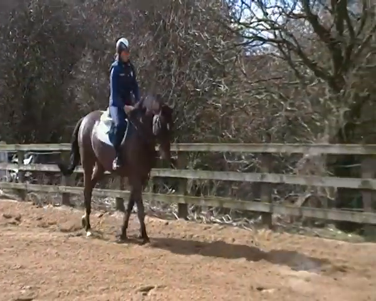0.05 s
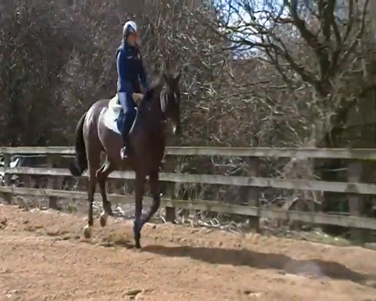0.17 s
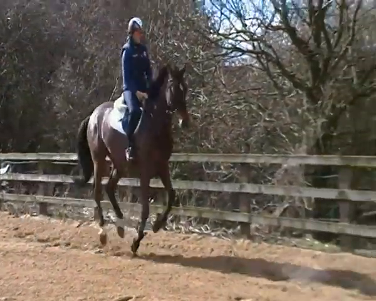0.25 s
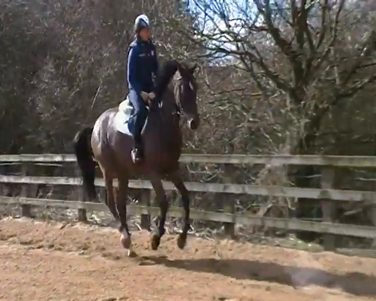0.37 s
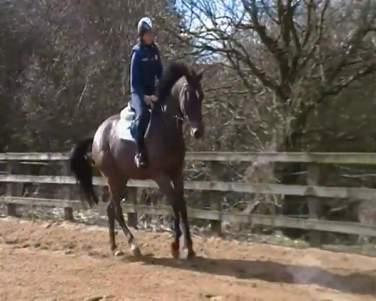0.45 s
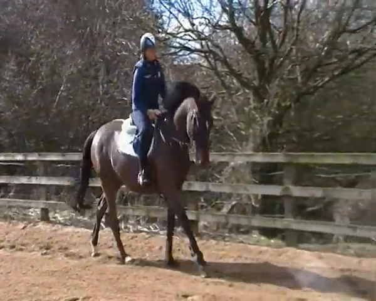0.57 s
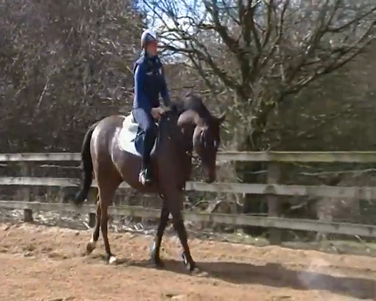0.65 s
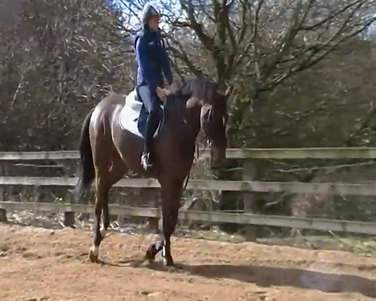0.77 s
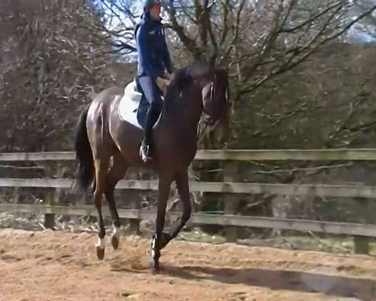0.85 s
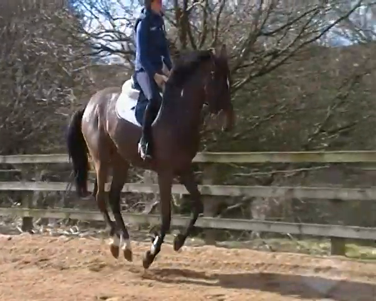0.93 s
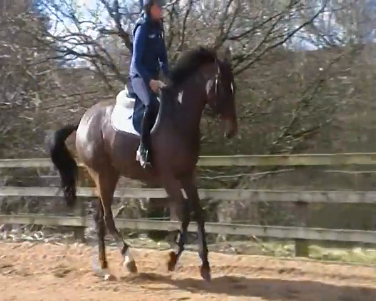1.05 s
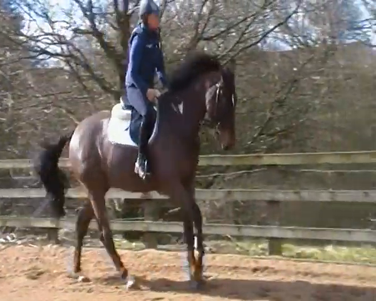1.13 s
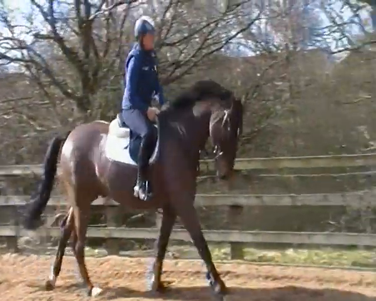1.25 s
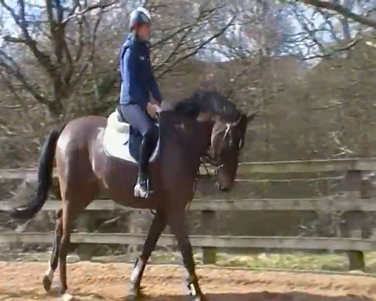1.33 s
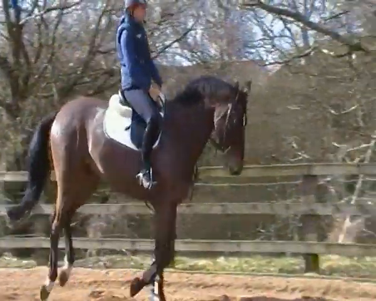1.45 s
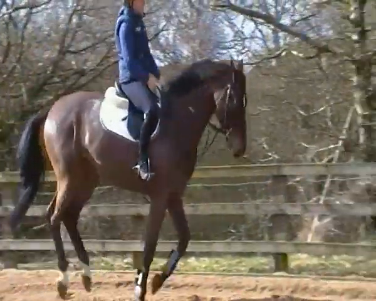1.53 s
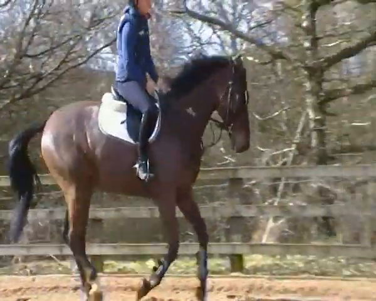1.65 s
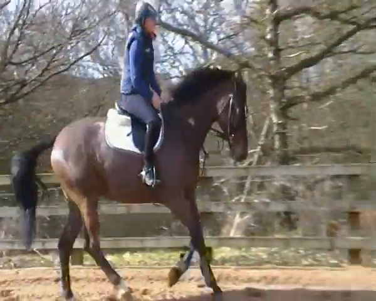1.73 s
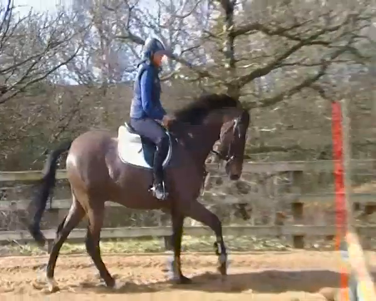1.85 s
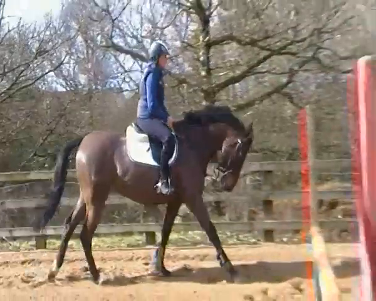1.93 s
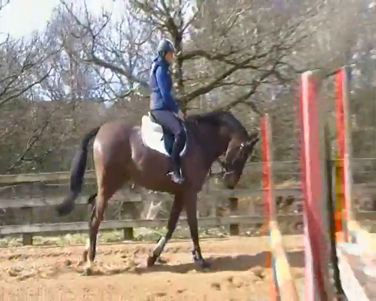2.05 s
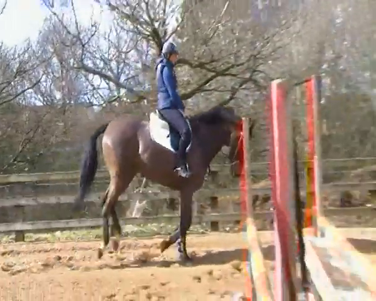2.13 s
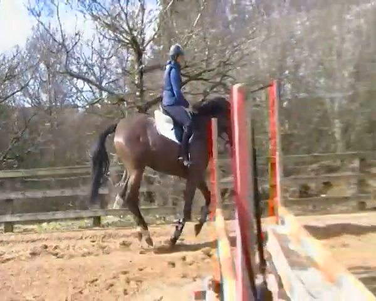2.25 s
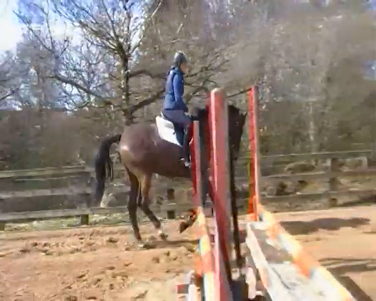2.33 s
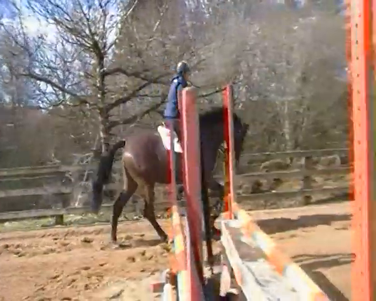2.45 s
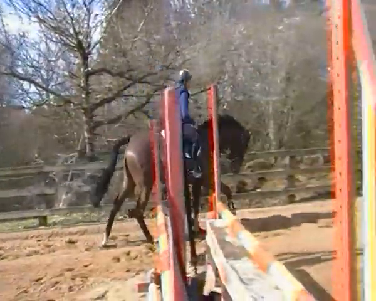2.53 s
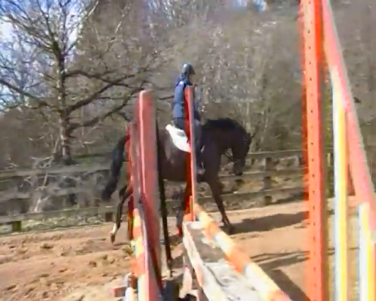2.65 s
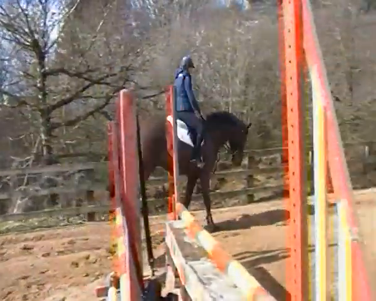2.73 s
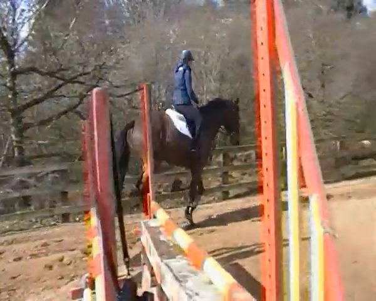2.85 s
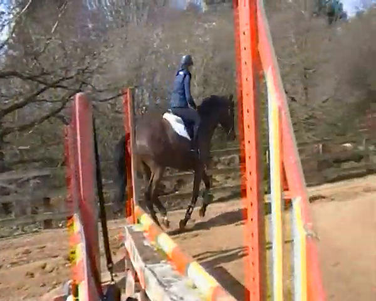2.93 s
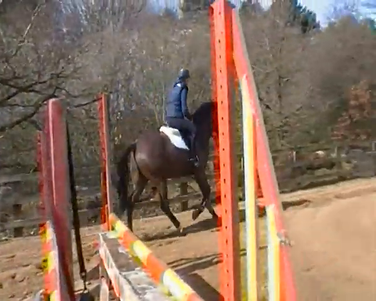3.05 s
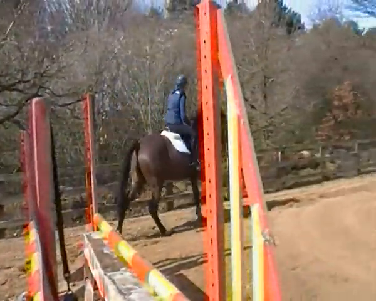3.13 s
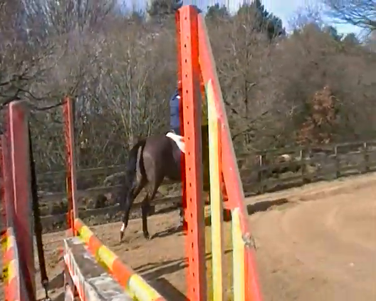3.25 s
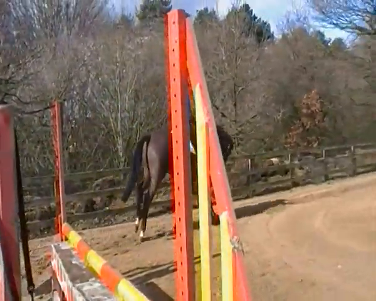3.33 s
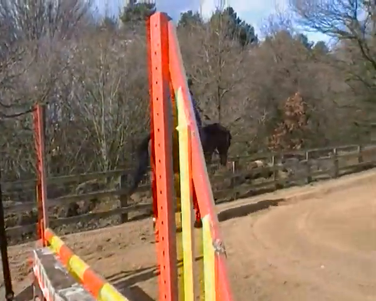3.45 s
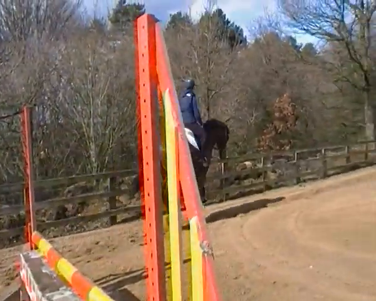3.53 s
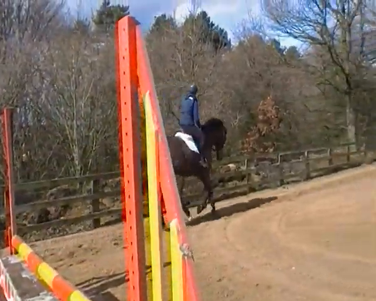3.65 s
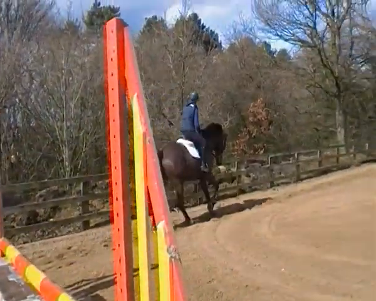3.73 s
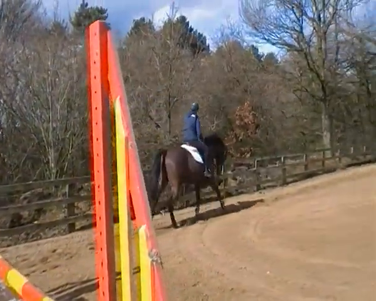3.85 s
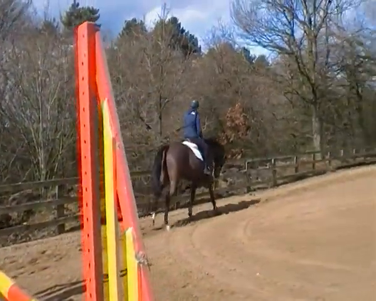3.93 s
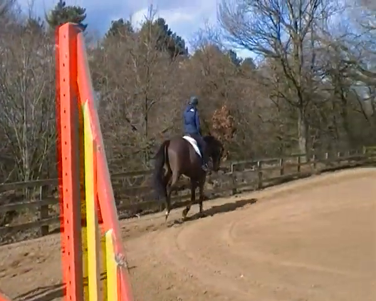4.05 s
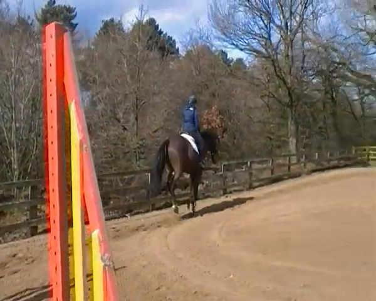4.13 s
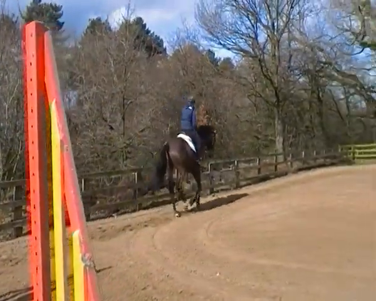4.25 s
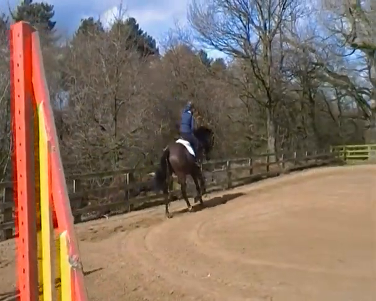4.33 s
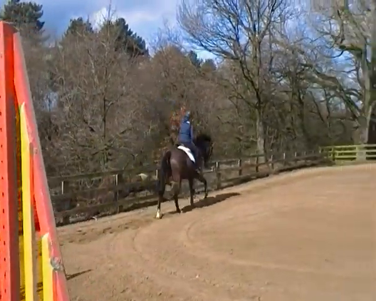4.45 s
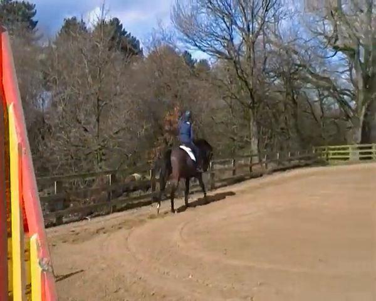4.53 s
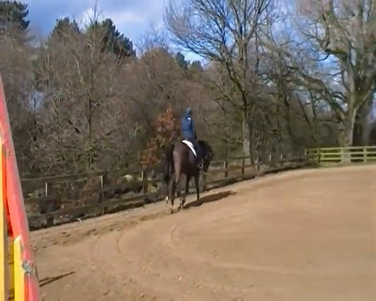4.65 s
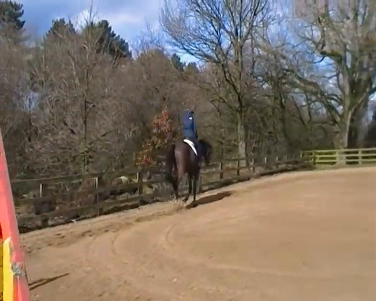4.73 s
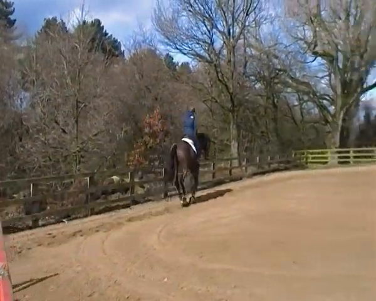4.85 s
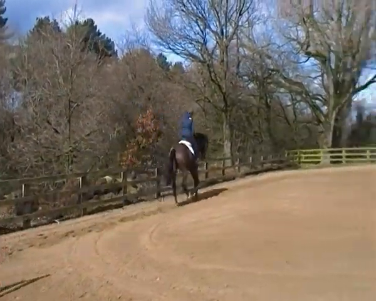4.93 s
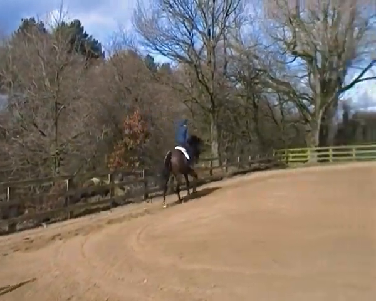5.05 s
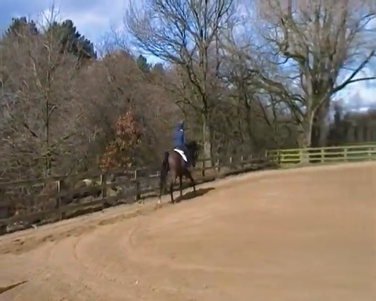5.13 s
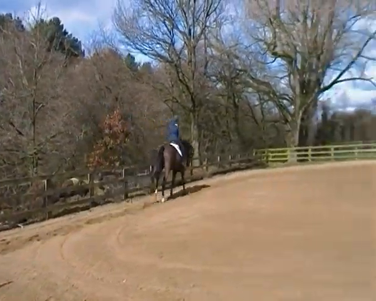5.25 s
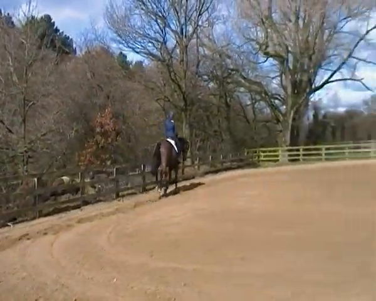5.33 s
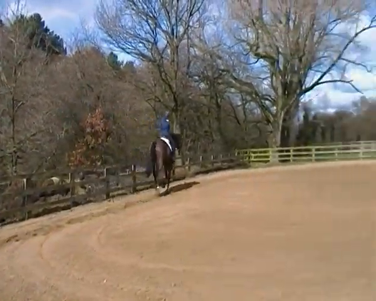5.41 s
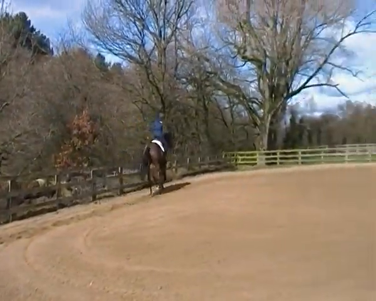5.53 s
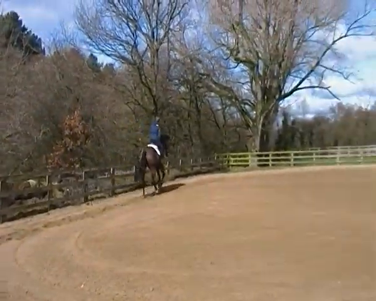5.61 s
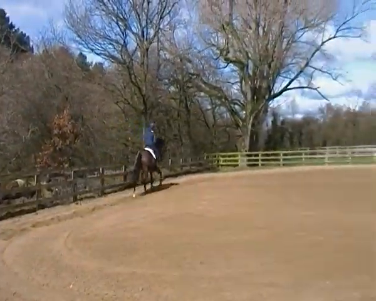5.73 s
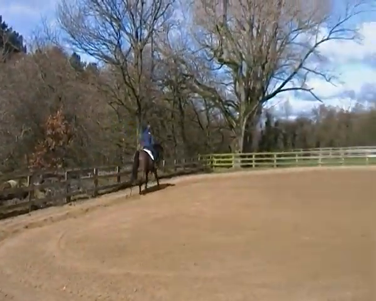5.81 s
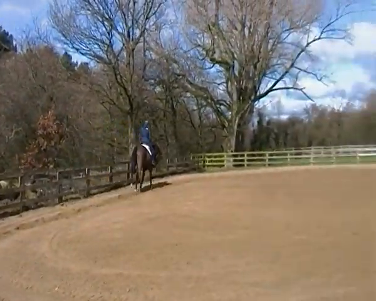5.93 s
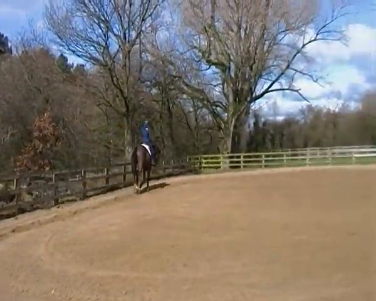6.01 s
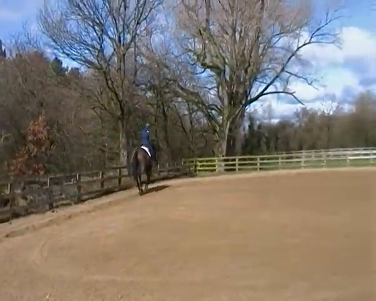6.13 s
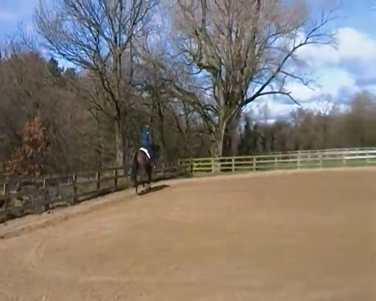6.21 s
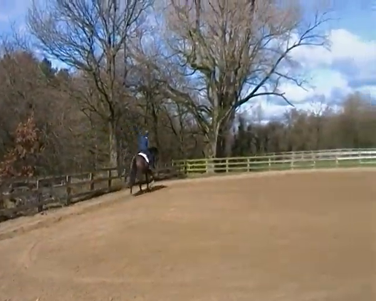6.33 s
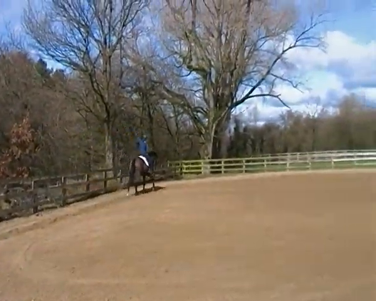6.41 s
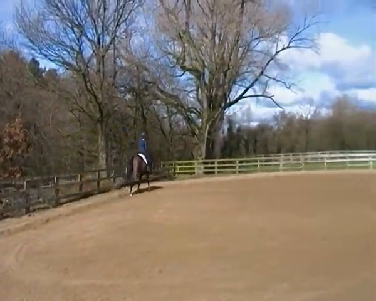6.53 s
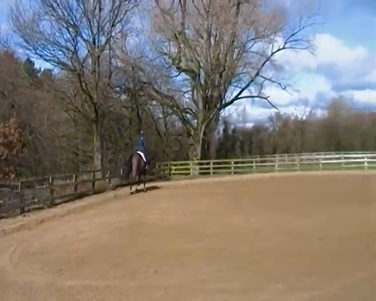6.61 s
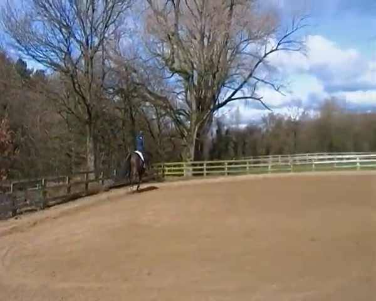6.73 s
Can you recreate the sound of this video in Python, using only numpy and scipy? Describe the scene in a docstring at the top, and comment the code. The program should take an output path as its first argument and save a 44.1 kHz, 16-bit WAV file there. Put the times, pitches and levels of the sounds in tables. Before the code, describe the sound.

A ridden horse canters by on soft sand, muffled thuds and faint sandy spray, while birds chirp over distant traffic and gusty wind.

```python
"""Dull hoof thuds come first: a ridden horse canters on a sand arena, each stride throwing up sand.
Thuds are damped swings with a hollow knock and a crunch; the sand is a shower of random grains.
Small birds sing in gliding sines that the trees echo, and gusts of shaped noise buffet the microphone.
Under a far traffic wash of steady noise, one engine drones while another gathers speed, both as sines."""
import sys
import numpy as np
from scipy import signal
from scipy.fft import rfft, irfft
from scipy.io import wavfile
from scipy.ndimage import uniform_filter1d

SR = 44100
rng = np.random.default_rng(int(sys.argv[2]) if len(sys.argv) > 2 else 0)


def unload_wav(signal):
    """Save mono or channel-first audio to the path in sys.argv[1] as 16-bit WAV at rate SR, clipped to [-1, 1]."""
    wavfile.write(
        sys.argv[1],
        SR,
        np.round(np.clip(np.atleast_2d(signal).T, -1, 1) * 32767).astype(np.int16),
    )


N = 298557
T = np.arange(N) / SR


def from_db(db):
    """Decibels to gain."""
    return 10 ** (np.asarray(db) / 20)


def rms_one(x):
    """Scale to unit rms."""
    return x / np.sqrt(np.mean(x ** 2) + 1e-20)


def in_time(rows, t=T):
    """Each column of a curve, joined by straight lines."""
    s, *columns = np.transpose(rows)
    return [np.interp(t, s, c) for c in columns]


def at_hz(points, hz):
    """Read a spectrum on a log-frequency axis."""
    f, value = np.transpose(points)
    return np.interp(np.log(hz + 1e-3), np.log(f), value)


def band(x, low_hz, high_hz, order=2):
    """Causal band-pass."""
    sos = signal.butter(order, [low_hz, min(high_hz, .45 * SR)], "band", fs=SR, output="sos")
    return signal.sosfilt(sos, x + 1e-18)


def panned(pan_db):
    """Left and right gains for a level difference, left louder when positive, at constant power."""
    sides = np.vstack([from_db(pan_db / 2), from_db(-pan_db / 2)])
    return sides / np.sqrt(np.cosh(pan_db * np.log(10) / 20))


def drift(corner_hz):
    """Slow random wander of unit rms: noise through two equal low-pass poles."""
    step = 40  # samples between drawn points
    pole = np.exp(-2 * np.pi * corner_hz * step / SR)
    white = rng.standard_normal(N // step + 2002)
    slow = signal.lfilter([1], [1, -2 * pole, pole * pole], white)[2000:]  # skip the settling
    return np.interp(np.arange(N) / step, np.arange(len(slow)), rms_one(slow))


def coloured(white, spectrum, likeness, low_hz, high_hz):
    """Two white signals become a coloured stereo pair with unit rms between the two frequencies."""
    hz = np.arange(N // 2 + 1) * SR / N
    rumble_cut = hz ** 2 / (hz ** 2 + 15 ** 2)
    mid, side = rfft(white) * from_db(at_hz(spectrum, hz)) * rumble_cut
    # the balance of mid and side sets how alike left and right are
    alike = np.clip(at_hz(likeness, hz), -1, 1)
    mid, side = np.sqrt(1 + alike) * mid, np.sqrt(1 - alike) * side
    pair = irfft(np.array([mid + side, mid - side]), N)
    reference = irfft(mid * (hz > low_hz) * (hz < high_hz), N)
    return pair / np.std(reference)


def add(out, s, sound):
    """Mix a short sound in at a time."""
    i = max(int(s * SR), 0)
    out[..., i:i + sound.shape[-1]] += sound[..., :max(N - i, 0)]


def tone(hz, delay_ms=0):
    """A sine of unit rms on a pitch track, reaching the right side a little later."""
    turns = np.cumsum(hz) / SR
    late_turns = turns - hz * delay_ms / 1000
    return np.sqrt(2) * np.sin(2 * np.pi * np.array([turns, late_turns]))


# hoof landings: (time [s], thud drive [dB], clop drive before trim [dB], knock pitch [Hz])
LANDINGS = [(.038, -16.5, -29, 497), (0.06, -23.5, -28.5, 553), (.576, -17.5, -41, 266),
            (.674, -14, -29, 300), (.778, -21.5, -31.5, 753), (1.081, -18.5, -26.5, 324),
            (1.315, -17, -36, 397), (1.442, -46, -33, 560), (1.938, -14, -34, 520),
            (1.995, -41, -33.5, 906), (2.605, -25.5, -28, 546), (3.112, -23.5, -35.5, 302),
            (3.259, -24, -37, 404), (3.92, -26, -37, 516), (4.452, -28, -39, 670), (4.583, -14.5, -28, 326),
            (5.096, -17.5, -29, 497), (5.23, -18, -32.5, 337), (5.408, -22.5, -46, 298),
            (5.8926, -17, -23.5, 310)]


def hooves(thud_hz=118, thud_s=.0058, press_s=.0011, clop_hz=560, clop_s=.012, clop_gain_db=2,
           grit_s=.0051, crunch_db=-9, crunch_s=.017):
    """The ground gives one heavily damped swing; the hoof adds a hollow knock and a crunch of packed sand."""
    out, t = np.zeros(N), np.arange(SR // 5) / SR
    for s, thud_db, clop_db, knock_hz in LANDINGS:
        firmness = np.exp(.06 * rng.standard_normal())  # firmer ground swings faster
        swing = 2 * np.sin(2 * np.pi * thud_hz * firmness * t)
        thud = swing * np.exp(-t / thud_s) * (1 - np.exp(-t / press_s))
        knock = np.sin(2 * np.pi * knock_hz * t) * np.exp(-t / clop_s)
        grit = rms_one(band(rng.standard_normal(len(t)), clop_hz / 2, clop_hz * 2, order=3))
        grit = grit * np.exp(-t / grit_s)
        crunch = rms_one(band(rng.standard_normal(len(t)), 310, 1580, order=3)) * np.exp(-t / crunch_s)
        clop = (knock + grit + from_db(crunch_db) * crunch) / 2
        add(out, s, from_db(thud_db) * thud + from_db(clop_db + clop_gain_db) * clop)
    return out


# canter strides: (time [s], drive of the sand thrown up [dB])
STRIDE_SPRAYS = [(.02, -62), (.674, -57.5), (1.315, -55.5), (1.95, -54), (2.605, -56.5), (3.22, -56.5),
                 (3.92, -68), (4.583, -60), (5.23, -67)]
# the three beats of every stride: (time into the stride [s], level relative to the stride [dB])
STRIDE_BEATS = [(.01, -1), (.1, -2), (.225, 0)]
# colour of falling sand: (frequency [Hz], relative density [dB per Hz])
SAND_COLOUR = [(1200, 13), (2200, 5.5), (4500, 8.5), (6500, 2), (8000, 2.3), (10000, 2), (11500, -3.5),
               (13000, -34)]
# stereo width, for the sand and for the far wash: (frequency [Hz], left-right likeness [-1 to 1])
STEREO_LIKENESS = [(30, 0.97), (120, 0.97), (600, 0.93), (1500, 0.66), (3000, 0.21), (6000, 0.35),
                   (9000, 0.18), (12000, 0.37)]


def sand(grain_db=-5.5, grains_per_s=5000, rise_s=.03, fall_s=.16):
    """Every beat of a stride kicks up sand, which falls back as thousands of grains of uneven size."""
    power, t = np.zeros(N), np.arange(SR) / SR
    spray = (1 - np.exp(-(t / rise_s) ** 2)) * np.exp(-t / fall_s)
    for s, db in STRIDE_SPRAYS:
        for late_s, beat_db in STRIDE_BEATS:
            add(power, s + late_s, (from_db(db + beat_db) * spray) ** 2)
    size_db = grain_db * np.minimum(rng.exponential(1, (2, N)), 5)
    sizes = from_db(size_db) * rng.standard_normal((2, N))
    grains = sizes * (rng.random((2, N)) < grains_per_s / SR)
    return np.sqrt(power) * coloured(grains, SAND_COLOUR, STEREO_LIKENESS, 8800, 10500)


# sharp little ticks: (time [s], peak before the last filter [dB], nominal band centre [Hz])
CONTACTS = [(.039, -27, 3020), (.043, -32, 7000), (.131, -29, 3300), (0.153, -32, 3500),
            (.172, -29.5, 4300), (.675, -34, 6000), (0.707, -28, 7200), (.764, -31, 3000),
            (1.176, -28, 8000), (1.381, -27, 3700), (1.994, -27, 7500), (2.71, -28, 8000),
            (3.061, -25, 8500), (3.1, -30, 8000), (4.449, -32, 3800), (4.584, -39, 2200),
            (6.7433, -21, 1000)]


def ticks(decay_s=.0022, top_hz=10000):
    """Very short broad bursts from small hard contacts."""
    out, t = np.zeros((2, N)), np.arange(SR // 40) / SR
    for s, db, hz in CONTACTS:
        noise = rng.standard_normal(len(t)) + .5 * rng.standard_normal((2, len(t)))
        burst = band(noise * np.exp(-t / decay_s), hz * .6, hz * 1.38, order=1)
        add(out, s, from_db(db) * burst / np.abs(burst).max())
    return band(out, 340, top_hz, order=6)


# repeated syllables: (time into the syllable [s], pitch [Hz], relative level [dB])
SLUR_SHAPE = [(0, 6780, -6), (.03, 6420, -1), (.07, 5900, 0), (.09, 5100, -1), (.113, 4300, 2)]
WARBLE_SHAPE = [(0, 3880, -6), (.021, 4600, 0), (.034, 3050, -1)]
TRILL_SHAPE = [(0, 4910, -31), (.008, 5630, -10), (.016, 6200, -16), (.023, 5150, -4), (.034, 4450, -7),
               (.048, 4093, -3), (.06, 4100, -14)]


def birds(level_db=-1.5, flutter_db=1.8):
    """A swelling run of falling slurs, a short warble and a trill among single notes, all echoed by the trees."""
    slurs = phrase(SLUR_SHAPE, start_s=.921, every_s=.186, count=6, level_db=-37.3, swell_db=14,
                   pan_db=8, delay_ms=.07, echo_db=4)
    warble = phrase(WARBLE_SHAPE, start_s=2.79, every_s=.137, count=3, level_db=-36, swell_db=0,
                    pan_db=-5, delay_ms=.025, echo_db=4.5)
    trill = phrase(TRILL_SHAPE, start_s=4.477, every_s=.137, count=7, level_db=-35.3, swell_db=-1.5,
                   pan_db=-6, delay_ms=.053, echo_db=4.8)
    direct, scattered = slurs + warble + trill + single_notes()
    return from_db(level_db) * (direct * from_db(flutter_db * drift(90)) + trees(scattered))


def phrase(syllable, start_s, every_s, count, level_db, swell_db, pan_db, delay_ms, echo_db):
    """One syllable repeated evenly, changing in level by swell_db from first to last, most at the start."""
    out = np.zeros((2, 2, N))  # direct pair, pair for the trees
    hz, shape_db = in_time(syllable, np.arange(int(syllable[-1][0] * SR)) / SR)
    for k in range(count):
        db = level_db - swell_db * (1 - k / (count - 1)) ** 2
        add(out, start_s + k * every_s, whistle(hz, db + shape_db, pan_db, delay_ms, echo_db))
    return out


# single whistled notes: (bird, time [s], length [s], first pitch [Hz], last pitch [Hz], level before trims [dB])
WHISTLED_NOTES = [ ("left", 1.388, .092, 5230, 5330, -50), ("ahead", 1.614, .019, 4620, 5030, -38),
                  ("ahead", 1.688, .014, 4280, 3950, -37), ("ahead", 1.757, .016, 3600, 3800, -34.5),
                  ("ahead", 1.793, .009, 3930, 4200, -40), ("ahead", 1.815, .016, 4400, 4080, -35),
                  ("ahead", 1.882, .012, 4180, 3950, -35.5), ("ahead", 1.952, .012, 3980, 4400, -36),
                  ("ahead", 2.018, .073, 3760, 3400, -38), ("ahead", 2.122, .026, 5240, 3750, -35.5),
                  ("left", 2.207, .074, 6020, 6740, -32), ("middle", 2.334, .058, 4580, 4460, -35),
                  ("left", 2.392, .035, 4730, 4150, -36), ("middle", 2.435, .061, 4560, 4330, -38),
                  ("left", 2.453, .056, 5300, 4730, -39.5), ("middle", 2.486, .051, 4750, 3240, -41),
                  ("middle", 2.555, .06, 4580, 4200, -39), ("far", 2.607, .035, 8500, 7380, -40),
                  ("far", 2.636, .1, 7680, 7320, -40), ("middle", 2.652, .059, 4490, 4470, -32.5),
                  ("middle", 2.774, .054, 4440, 4490, -35), ("left", 2.806, .07, 5520, 4350, -35.5),
                  ("middle", 2.874, .026, 3950, 3500, -39), ("middle", 2.903, .019, 5200, 4800, -40),
                  ("middle", 2.95, .04, 4300, 4850, -38), ("right", 3.042, .039, 5190, 4800, -43),
                  ("middle", 3.149, .02, 3470, 3050, -45), ("middle", 3.222, .017, 3580, 3200, -47),
                  ("middle", 3.249, .04, 4280, 4080, -45), ("middle", 3.485, .031, 4150, 4090, -43),
                  ("far", 3.696, .035, 6220, 7460, -44), ("far", 3.726, .031, 7200, 6050, -42),
                  ("right", 3.788, .052, 3370, 3670, -45), ("far", 3.89, .14, 8200, 7400, -47.5),
                  ("far", 4.075, .12, 8350, 6950, -47), ("right", 4.232, .04, 5700, 5300, -40),
                  ("right", 4.275, .07, 5380, 5500, -43), ("far", 4.388, .034, 7900, 6600, -40.5),
                  ("far", 4.418, .06, 6370, 6250, -43), ("middle", 4.572, .058, 3600, 3060, -47),
                  ("right", 4.836, .036, 4050, 4150, -42), ("left", 4.97, .05, 2820, 3130, -44),
                  ("far", 5.028, .034, 7250, 6950, -43), ("middle", 5.106, .023, 4180, 3970, -42),
                  ("far", 5.159, .14, 7450, 7000, -49.5), ("far", 5.403, .032, 7000, 6500, -47),
                  ("far", 5.455, .04, 7300, 8000, -42.5), ("far", 5.498, .083, 7480, 6640, -40.5),
                  ("far", 5.595, .06, 3100, 3260, -52), ("right", 5.651, .09, 5550, 5760, -46),
                  ("far", 5.77, .042, 4060, 3920, -44), ("far", 5.784, .061, 2850, 3550, -47.5),
                  ("far", 5.901, .037, 3800, 3400, -46), ("far", 5.936, .05, 3670, 3730, -45),
                  ("left", 6.024, .04, 7400, 6350, -41), ("left", 6.065, .12, 6450, 6740, -43),
                  ("ahead", 5.991, .15, 1540, 1690, -50)]
# where each bird sits and how it sings, by bird:
# (left-right difference [dB], right side delay [ms], base echo send [dB], pitch waver [share])
BIRD_PERCHES = {"ahead": (-1, -.02, -1.5, .004), "left": (6, .08, 2, .006), "middle": (-2, .032, 1.5, .003),
                "right": (-8, .056, 1, .008), "far": (-1, .08, 4, .009)}


def single_notes(level_db=.2, near_db=-35, wet_per_db=.15, slur_wet_db=4, droop_from_s=.06, settling=1.3):
    """Notes glide fast and settle; long falling ones droop at the end. Faint or wide glides get more echo."""
    out = np.zeros((2, 2, N))
    for bird, s, length, first_hz, last_hz, db in WHISTLED_NOTES:
        pan_db, delay_ms, echo_db, waver = BIRD_PERCHES[bird]
        # settling counts the time constants that pass during a note
        bend = settling if length > droop_from_s and last_hz < first_hz else -settling
        glide = np.expm1(bend * np.linspace(0, 1, int(length * SR)))
        hz = first_hz + (last_hz - first_hz) * glide / glide[-1]
        faint_db = wet_per_db * (near_db - db)
        wide_db = slur_wet_db * abs(np.log2(first_hz / last_hz))
        echo_db = echo_db + faint_db + wide_db
        add(out, s, whistle(hz, db + level_db, pan_db, delay_ms, echo_db, waver))
    return out


def whistle(hz, db, pan_db, delay_ms, echo_db, waver=.005, edge=.17):
    """A nearly pure, slightly unsteady note: the pair heard directly and the pair sent into the trees."""
    wobble = rms_one(uniform_filter1d(rng.standard_normal(len(hz)), size=SR // 400))
    unsteady_hz = hz * (1 + waver * wobble)
    note = from_db(db) * signal.windows.tukey(len(hz), edge) * tone(unsteady_hz, delay_ms)
    return np.array([note * panned(pan_db), note * from_db(echo_db)])


def trees(x, echo_db=-4, t60=.81, first_s=.0046, apart=.49, edge_s=.073, edge_spread_s=.0027, edge_db=4):
    """Trunks and branches scatter a song back as a diffuse tail; the edge of the wood returns one denser echo."""
    t = np.arange(SR) / SR
    scatter = rng.standard_normal(SR) + apart * rng.standard_normal((2, SR))
    dying = from_db(-60 * t / t60) * (1 - np.exp(-(t / first_s) ** 2))
    wood_edge = 1 + from_db(edge_db) * np.exp(-((t - edge_s) / edge_spread_s) ** 2)
    tail = scatter * dying * wood_edge
    tail /= np.sqrt(np.sum(tail ** 2) / 2)
    return from_db(echo_db) * signal.fftconvolve(x, tail, axes=1)[:, :N]


def squeak(s=4.116, rise_s=.0055, fall_s=.0085, level_db=-31, low_hz=10900, bend_hz=50):
    """A brief thin whistle with no echo, lowest in pitch where it is loudest."""
    width_s = np.where(T < s, rise_s, fall_s)
    away = np.minimum(((T - s) / width_s) ** 2, 10)
    swell = np.exp(-away / 2) * (away < 10)
    return from_db(level_db) * swell * panned(pan_db=3.0) * tone(low_hz + bend_hz * away)


# gusts on the microphone: (time of the peak [s], half-width [s], level before trim [dB], left-right [dB])
GUST_PEAKS = [(.3, .16, -29.5, 14), (.59, .06, -25, 1.5), (.84, .05, -23.5, 9), (1.06, .08, -18, 1),
              (1.2, .045, -13.5, 6), (1.33, .1, -22.5, 11), (1.7, .25, -31, 6), (2.8, .09, -24.5, -3),
              (3.06, .09, -19, -4), (3.21, .04, -24, 6), (3.37, .04, -22.5, 14), (3.49, .1, -25, -14),
              (3.72, .12, -35, 3)]
# colour of the buffeting: (frequency [Hz], relative density [dB per Hz])
BUFFET_COLOUR = [(20, 10), (35, 5.5), (70, 1.5), (110, -8.5), (180, -27), (300, -41), (600, -73.5),
                 (1500, -90)]


def wind(level_db=-1.3, breeze_db=-47, lump_db=1.0, flap_db=-5.2, strong_db=-16, flap_growth=1.7):
    """Gusts over a light breeze press eddies on each port separately; strong ones shed smaller, faster eddies."""
    gusts = sum((from_db(db) * panned(pan_db)) ** 2 * np.exp(-((T - s) / width_s) ** 2)
                for s, width_s, db, pan_db in GUST_PEAKS)
    pressure = np.sqrt(from_db(breeze_db) ** 2 + gusts)
    port_likeness = [(20, .1), (300, .2)]  # (frequency [Hz], left-right likeness)
    swirl = coloured(rng.standard_normal((2, N)), BUFFET_COLOUR, port_likeness, 18, 48)
    # even out the noise's own swells, so the gusts set the level
    strength = np.sqrt(uniform_filter1d(rms_one(swirl) ** 2, size=SR // 12))
    buffeting = pressure * from_db(level_db + lump_db * drift(36)) * swirl / strength
    flaps = rms_one(band(rng.standard_normal((2, N)), 66, 153, order=3))
    flap_level = from_db(strong_db + flap_db) * (pressure / from_db(strong_db)) ** flap_growth
    return buffeting + flap_level * flaps


# engine gathering speed: (time [s], fundamental level [dB], octave level [dB]), before fading and pan
RISING_ENGINE = [(0, -45, -33.5), (2, -29, -41), (2.7, -27.5, -35), (3.6, -27.5, -60), (5.2, -32.5, -46),
                 (6.77, -37, -49)]
# steady engine: (time [s], pitch before waver [Hz], level before fading and pan [dB])
STEADY_ENGINE = [(0, 130, -45), (3.4, 139.5, -36.5), (5.6, 142, -40), (6.77, 141, -52)]


def engines(start_hz=22.0, rise_hz_per_s=14.35, fading_db=.35, waver=.0033):
    """Only the lowest firing tones carry this far, fading in and out on the way."""
    rising_hz = start_hz + rise_hz_per_s * T
    first_db, second_db = in_time(RISING_ENGINE)
    drone_hz, drone_db = in_time(STEADY_ENGINE)
    out = np.zeros((2, N))
    for hz, db in [(rising_hz, first_db), (2 * rising_hz, second_db), (drone_hz, drone_db)]:
        level = from_db(db + fading_db * drift(15))
        out += level * tone(hz * (1 + waver * drift(5.5)))
    return panned(pan_db=.9) * out


# colour of far traffic and trees: (frequency [Hz], relative density [dB per Hz])
AIR_COLOUR = [(22, 21), (50, 25), (100, 17), (200, 11), (300, 4.5), (400, -3.5), (530, 1.5), (1050, -0.5),
              (1600, -8), (2500, -14), (5000, -20.7), (8000, -20.5), (10200, -21.7), (11500, -28),
              (12500, -50)]


def air(level_db=-43.7, fade_db_per_s=.15):
    """A smooth noise wash of far traffic and trees, slowly easing."""
    wash = coloured(rng.standard_normal((2, N)), AIR_COLOUR, STEREO_LIKENESS, 500, 1500)
    return from_db(level_db - fade_db_per_s * T) * wash


def scene():
    """Horse, birds and the open air around them."""
    return hooves() + sand() + ticks() + birds() + squeak() + wind() + engines() + air()


def limiter(x, threshold_db=-1, release_db_per_s=50):
    """Peaks over the threshold turn both channels down; the gain then creeps back."""
    peak_db = 20 * np.log10(np.abs(x).max(axis=0) + 1e-9)
    over_db = np.maximum(peak_db - threshold_db, 0)
    held_db = np.maximum.accumulate(over_db + release_db_per_s * T) - release_db_per_s * T
    smooth = SR // 250  # 4 ms average
    return x * from_db(-signal.lfilter(np.ones(smooth) / smooth, [1], held_db))


def record(dry, cutoff_hz=12300):
    """Loud peaks duck the gain, anything still past full scale clips, and the top is cut steeply."""
    clipped = np.clip(limiter(dry), -1, 1)
    return signal.sosfilt(signal.ellip(10, .1, 90, cutoff_hz, fs=SR, output="sos"), clipped)


dry = scene()
out = record(dry)
unload_wav(out)
```